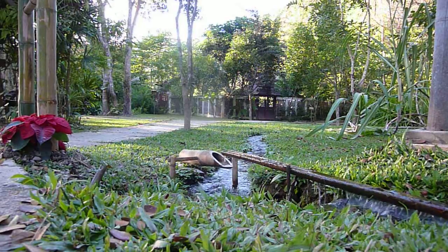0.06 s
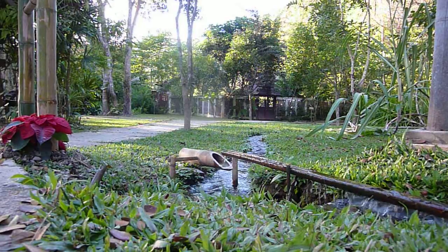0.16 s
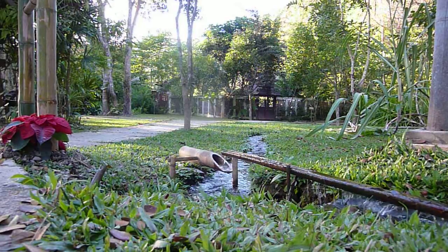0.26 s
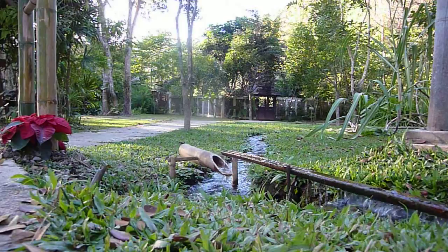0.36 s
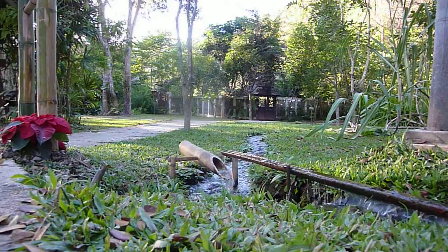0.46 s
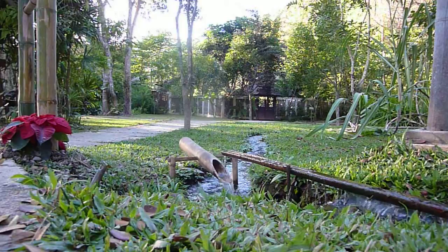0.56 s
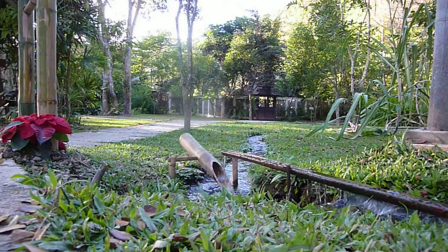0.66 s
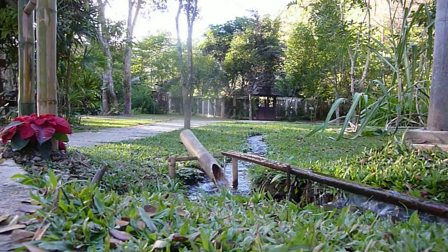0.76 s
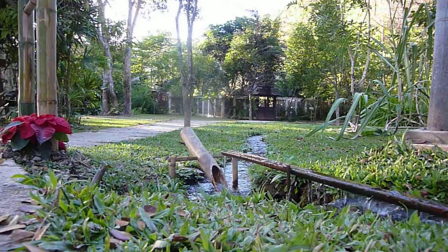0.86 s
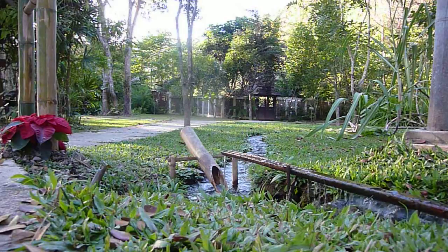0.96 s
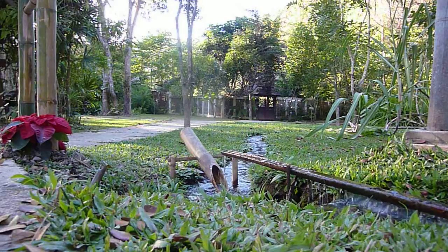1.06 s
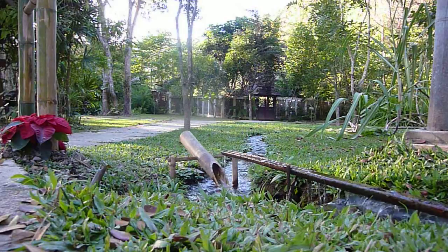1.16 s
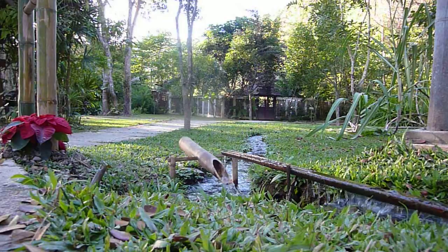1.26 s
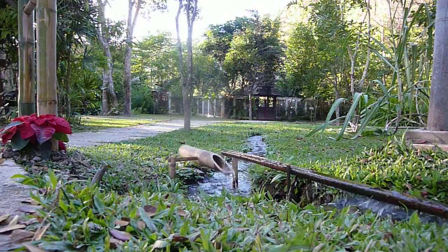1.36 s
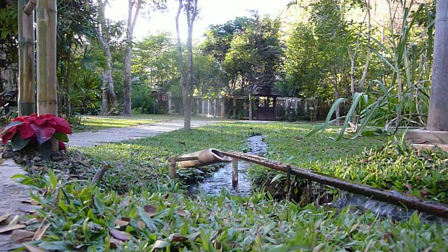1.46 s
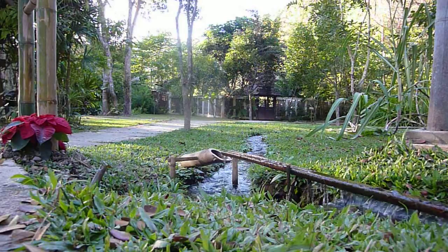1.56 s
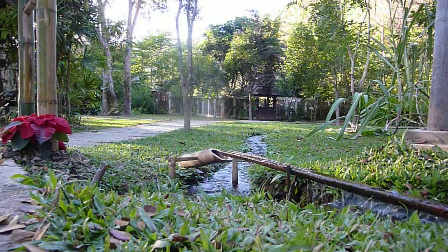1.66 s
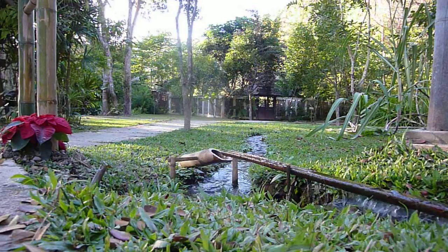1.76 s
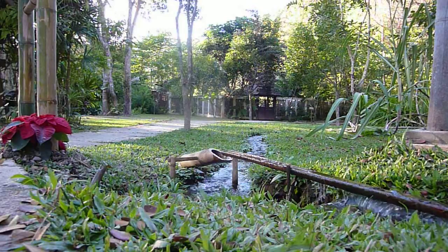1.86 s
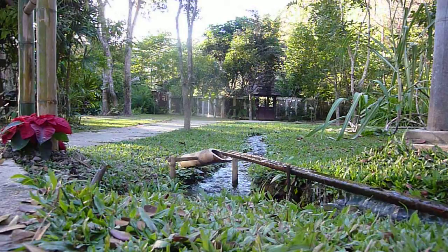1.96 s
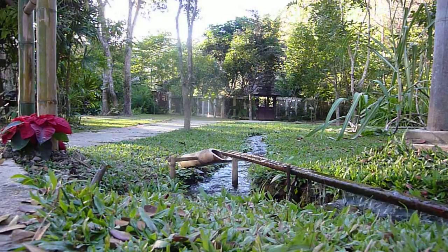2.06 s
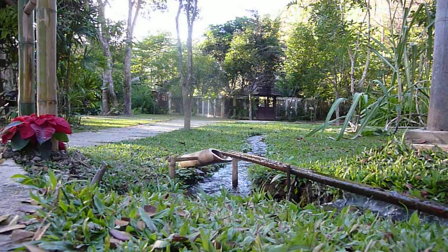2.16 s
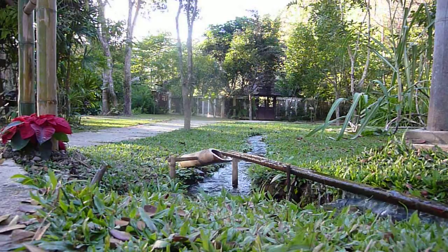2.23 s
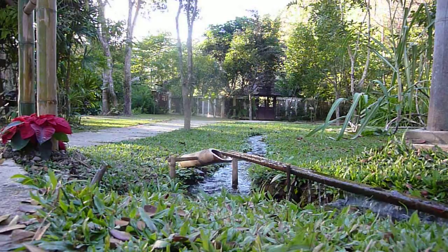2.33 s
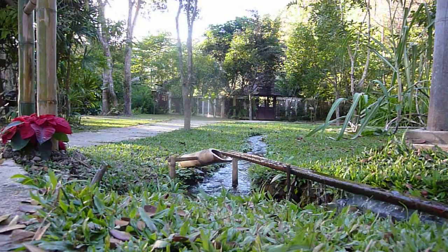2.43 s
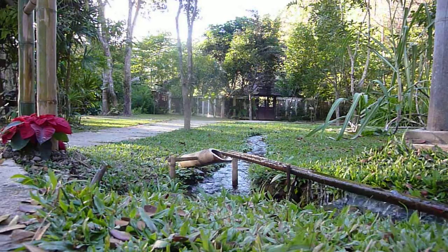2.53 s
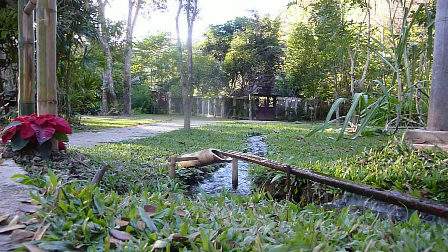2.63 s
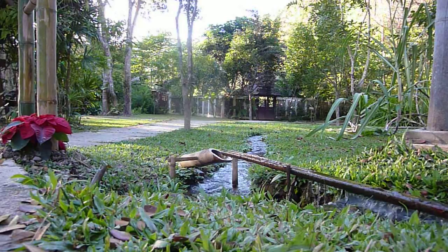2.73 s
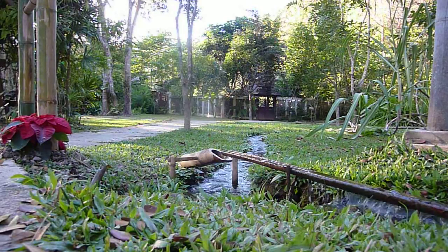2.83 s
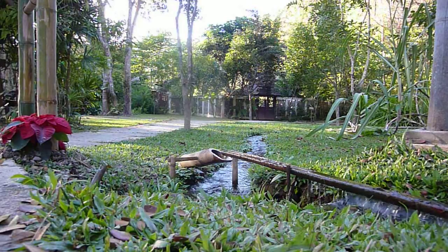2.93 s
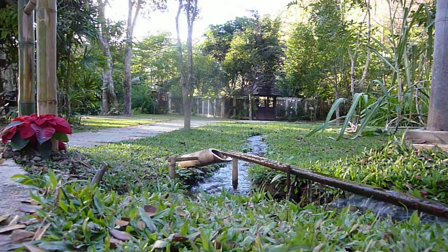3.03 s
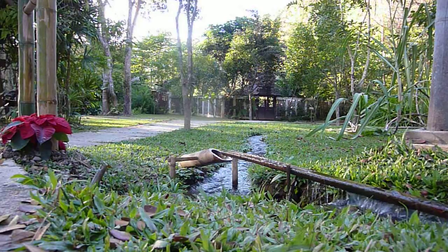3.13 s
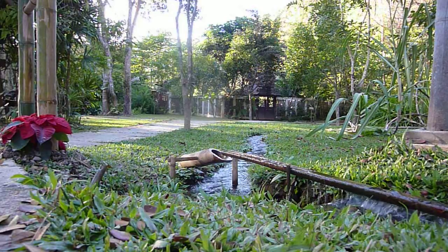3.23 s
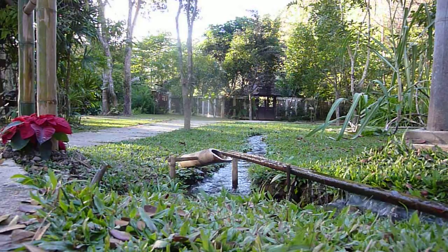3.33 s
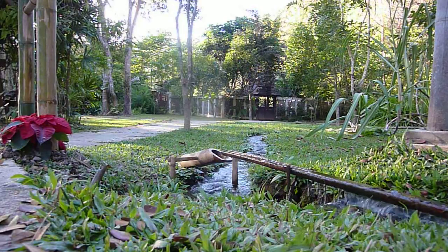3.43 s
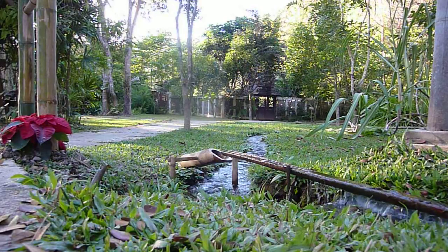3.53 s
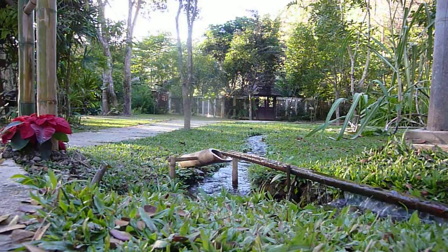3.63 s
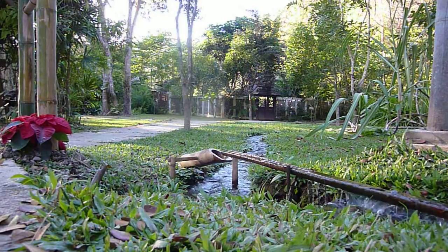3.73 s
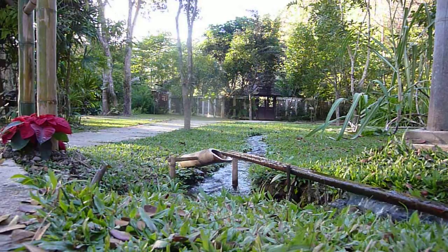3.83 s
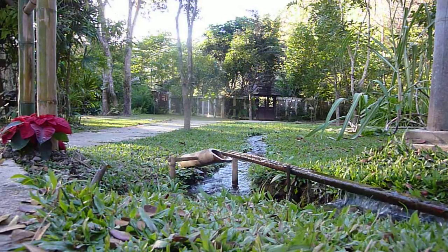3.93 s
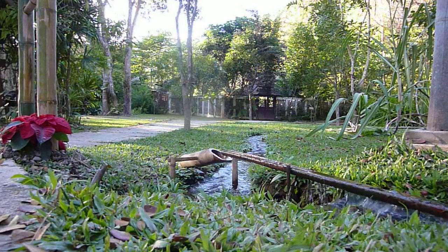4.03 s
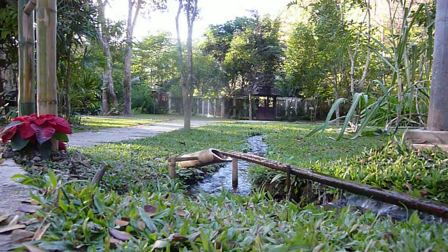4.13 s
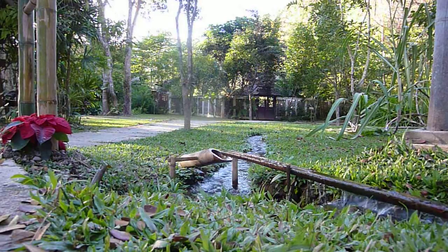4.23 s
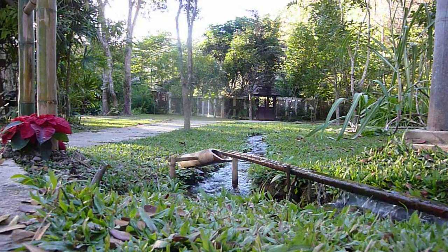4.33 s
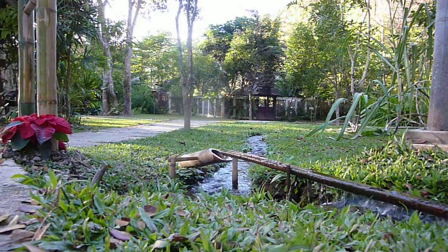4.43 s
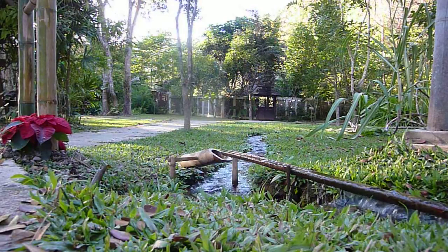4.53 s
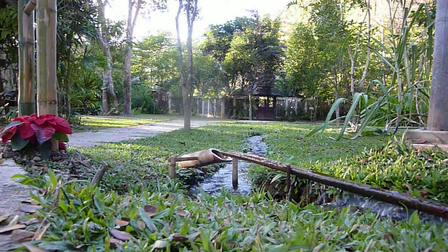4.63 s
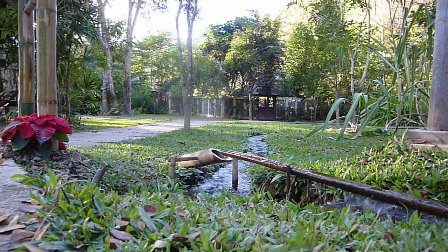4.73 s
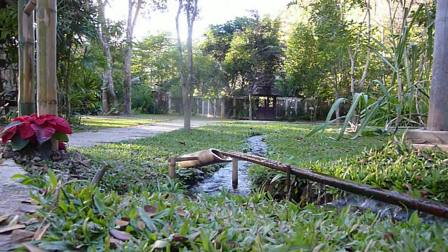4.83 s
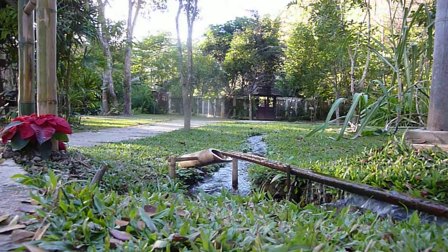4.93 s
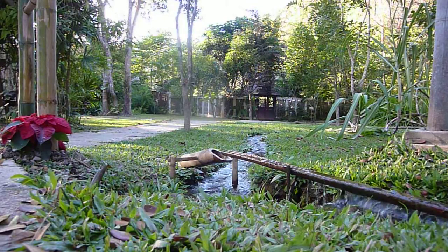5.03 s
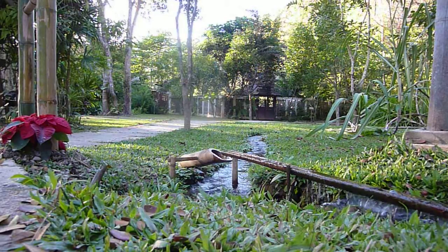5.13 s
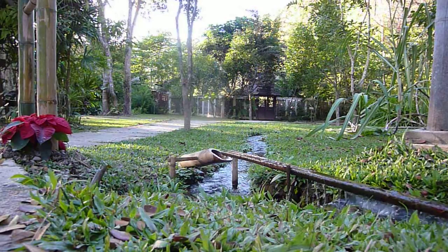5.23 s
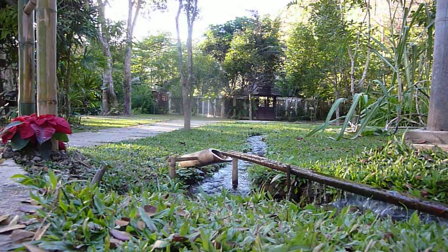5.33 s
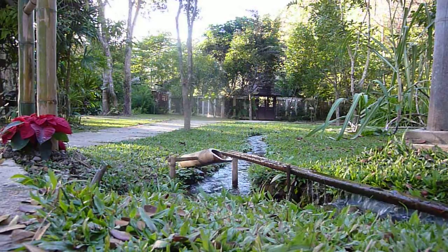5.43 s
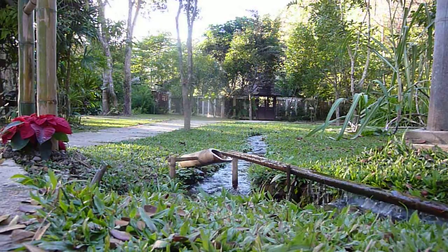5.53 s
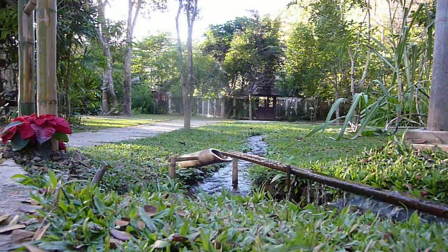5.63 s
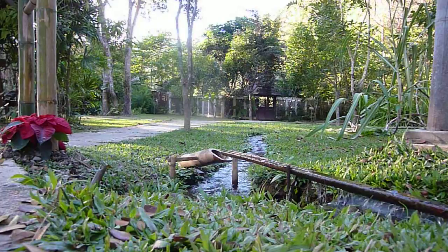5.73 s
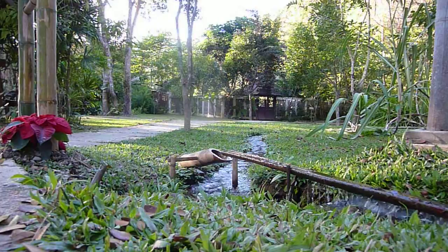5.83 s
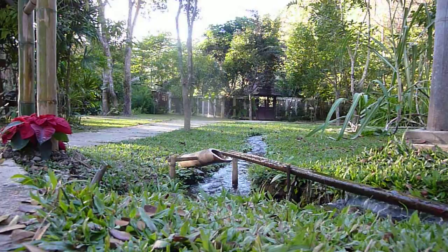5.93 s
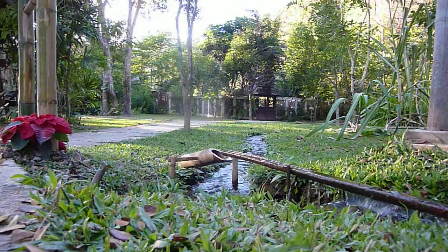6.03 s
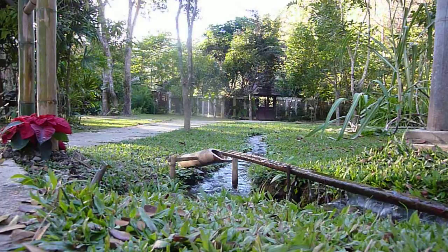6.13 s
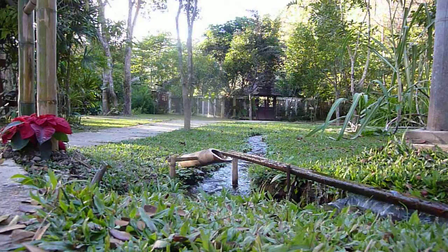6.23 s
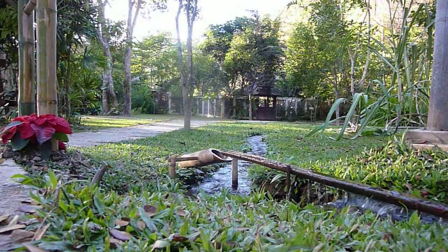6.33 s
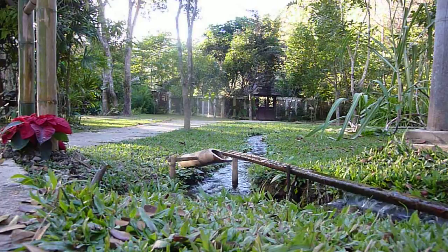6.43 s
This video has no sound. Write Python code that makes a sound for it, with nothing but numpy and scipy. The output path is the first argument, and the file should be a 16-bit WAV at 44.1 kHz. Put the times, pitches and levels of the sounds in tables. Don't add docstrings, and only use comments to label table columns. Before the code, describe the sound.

A small garden stream gurgles and bubbles steadily while bamboo spouts tip with hollow knocks, one very loud near the start, others softer later.

```python
import sys
import numpy as np
from scipy import signal
from scipy.fft import rfft, irfft, next_fast_len
from scipy.io import wavfile
from scipy.ndimage import map_coordinates

SR = 44100
rng = np.random.default_rng(int(sys.argv[2]) if len(sys.argv) > 2 else 0)


def to_linear_factor(level_db):
    exponent = np.asarray(level_db, float) / 20
    return 10 ** exponent


def log_audio(samples):
    frames = np.atleast_2d(samples).T
    limited = np.clip(frames, -1, 1)
    pcm = np.round(limited * 32767).astype(np.int16)
    wavfile.write(sys.argv[1], SR, pcm)


N = 285768

# (time [s], level [dB])
FLOW = [(0.0, -41.5), (0.49, -41.5), (1.24, -41), (1.68, -40.5), (2.11, -43), (3.99, -42.5), (4.26, -42.5),
        (4.55, -43), (4.96, -42), (5.25, -40), (5.65, -43), (6.48, -42)]
# (time [s], peak level [dB], pitch [Hz])
BIG_BUBBLES = [(0.162, -38, 474), (0.797, -40, 377), (0.866, -29, 410), (1.077, -32, 480),
               (1.724, -35.5, 423), (1.735, -36, 560), (1.796, -32, 560), (1.85, -33, 450),
               (2.123, -34, 400), (2.148, -33, 455), (2.607, -36, 620), (2.775, -33.5, 350),
               (2.827, -33.5, 347), (2.854, -29, 404), (2.858, -33, 620), (2.92, -32.5, 363),
               (2.983, -35, 396), (3.369, -33, 457), (3.539, -33, 400), (3.71, -31.5, 340),
               (4.027, -32, 390), (4.17, -34, 395), (4.2, -26.5, 386), (4.369, -34, 450),
               (4.485, -36.5, 410), (4.681, -29, 364), (5.572, -30.5, 400), (5.937, -35, 416),
               (5.971, -34, 367)]
# (time [s], peak level [dB], pitch [Hz])
MIDDLING_BUBBLES = [(0.673, -36, 1340), (0.764, -32, 1070), (0.855, -27.5, 1660), (0.894, -32, 1590),
                    (1.076, -31.5, 1020), (1.327, -47, 930), (1.614, -29.5, 1160), (1.668, -31, 980),
                    (1.838, -36, 950), (1.965, -35, 1050), (2.128, -30.5, 1820), (2.446, -30.5, 1140),
                    (2.651, -30.5, 1300), (2.819, -30.5, 1063), (2.839, -32, 1290), (2.983, -27.5, 1330),
                    (3.129, -34.5, 1105), (3.244, -33.5, 1370), (3.458, -30, 1270), (3.922, -30.5, 1026),
                    (4.052, -35.5, 870), (4.322, -36, 1350), (4.345, -29.5, 1020), (4.677, -35.5, 1040),
                    (4.907, -31, 985), (4.966, -32, 1480), (4.996, -35.5, 1020), (5.921, -27.5, 1096),
                    (6.077, -31.5, 1045), (6.416, -32, 1220)]
# (time [s], peak level [dB], pitch [Hz])
SMALL_DROPS = [(0.065, -32.5, 2540), (0.156, -35, 2690), (0.203, -37, 2620), (0.884, -36, 2920),
               (0.992, -35, 2720), (1.177, -38.5, 6050), (1.224, -36.5, 6470), (1.9145, -34.5, 2440),
               (2.736, -40, 6200), (2.755, -32, 5120), (2.835, -36, 3010), (3.258, -37, 2700),
               (3.315, -33, 5340), (3.555, -35, 2430), (3.6735, -35.5, 5170), (4.157, -33.5, 2480),
               (4.621, -38, 6600), (4.691, -37, 4400), (4.932, -41, 2680), (4.959, -38, 4450),
               (5.161, -37, 2370), (5.309, -40, 2800), (5.459, -32.5, 2450), (5.47, -34, 2480),
               (5.49, -30, 2420), (5.95, -37, 2760), (6.211, -35, 2700)]
# (frequency [Hz], level [dB])
BANK_COLOUR = [(250, -6), (600, -3.5), (780, -3), (1050, 0.5), (1900, 0), (2250, -6), (2700, 0),
               (4000, -2.5)]
# (frequency [Hz], level per Hz [dB])
RUSH_COLOUR = [(71, -50.5), (120, -15.5), (195, -22.5), (384, -0.5), (769, -13), (1340, -12.5), (2220, -16),
               (4840, -21.5), (5460, -21), (6170, -19.5), (7600, -20), (9880, -51.5), (16700, -120)]
# (frequency [Hz], level per Hz [dB])
RUMBLE_COLOUR = [(12, -41.5), (25, -3), (45, -8.5), (60, -1), (75, 0.5), (130, -20.5), (200, -26)]
# (time [s], peak level [dB])
VEHICLES = [
    (1.251, -68.5),
    (2.6, -72.5),
    (3.95, -61.5),
    (5.1, -64),
    (6.2, -64.5),
]
# (frequency [Hz], likeness [0 to 1])
LIKENESS = [(60, 0.87), (160, 0.95), (430, 1), (1130, 0.96), (3020, 0.72), (8050, 0.52)]
# (frequency
# [Hz], level [dB], time to fall 60 dB [s], first swing [out 1, in -1])
FAR_TIP = [(388, -13.8, 0.021, -1), (456, -21.8, 0.105, 1), (500, -7.2, 0.132, -1), (556, -17.4, 0.137, -1),
           (561, -1.3, 0.03, 1), (883, -19.9, 0.018, -1), (1663, -39.2, 0.083, -1)]
FAR_ECHO = [(491, -23.5, 0.14, 1), (507.3, -26.5, 0.35, -0.76)]
FAR_SETTLE = [(516, -38, 0.73, 0.8)]
NEAR_MOUTH = [(391, -20.2, 0.01, -1), (578, -22.3, 0.106, 1), (608, -20.5, 0.051, -1),
              (883, -30.2, 0.293, -1), (933, -31.1, 0.038, -1), (990, -36.8, 0.206, 1),
              (1050, -29.8, 0.108, 1), (1111, -35.9, 0.247, -1), (1391, -28.4, 0.078, -1),
              (1412, -26.9, 0.035, 1), (1762, -36.7, 0.057, 1)]
NEAR_HEEL = [(307, -6.5, 0.01, 1), (483, 6.7, 0.01, -1), (557, -7.1, 0.128, 1), (642, -5.2, 0.036, -1),
             (667, -7.6, 0.116, -1), (744, -5.0, 0.017, 1), (946, -36.6, 0.271, 1), (1039, -10.2, 0.019, 1),
             (1211, -24.6, 0.086, 1), (1306, 0.6, 0.011, 1), (1569, -8.5, 0.015, 1),
             (1915, -28.0, 0.025, 1), (2398, -43.1, 0.034, 1)]
NEAR_RATTLE = [(645, -33.5, 0.13, -1), (560, -37.5, 0.17, 1)]
NEAR_REBOUND = [(540, -22.5, 0.09, -0.67), (560, -34, 0.5, 0.98)]
THIN_TIP = [(309, -51.6, 0.4, 1), (477, -20.8, 0.131, -1), (524, -11.1, 0.029, -1), (643, -27.2, 0.136, -1),
            (699, -21.0, 0.085, -1), (758, -6.9, 0.113, 1), (783, -19.0, 0.36, -1), (1017, -10.2, 0.01, -1),
            (1343, -7.4, 0.012, -1), (1446, -28.4, 0.063, 1), (2221, -34.5, 0.018, 1)]
WIDE_TIP = [(415, -16.6, 0.256, 1), (461, -10.2, 0.164, -1), (483, -9.2, 0.076, 1), (628, -33.5, 0.184, -1),
            (1132, -24.4, 0.021, -1)]
THIN_REBOUND = [(752, -26.8, 0.108, 1)]
WIDE_ECHO = [(415, -33.0, 0.5, 1), (463, -21.9, 0.335, -1), (474, -31.6, 0.5, 1)]
WIDE_SETTLE = [(423, -33.0, 0.5, 1)]
LAST_TIP = [(344, -12.7, 0.015, -1), (399, -23.7, 0.116, -1), (421, -13.3, 0.036, 1),
            (468, -20.6, 0.125, 1), (503, -18.4, 0.122, 1), (555, -17.0, 0.217, -1), (626, -14.4, 0.016, 1),
            (794, -12.6, 0.131, 1), (806, -9.5, 0.056, -1), (914, -28.9, 0.384, 1),
            (1070, -18.3, 0.021, -1), (1154, -29.3, 0.104, -1), (1359, -29.9, 0.059, -1),
            (1527, -32.9, 0.058, -1)]
# (time [s], rings freely until [s],
# left over right [dB], tube pitches [table above])
KNOCKS = [(.2403, .287, -.5, FAR_TIP), (.3203, .4, -1.3, FAR_ECHO), (.4316, .5, -1.5, FAR_SETTLE),
          (1.3405, 1.41, -1.6, NEAR_MOUTH), (1.50464, 1.546, -.9, NEAR_HEEL),
          (1.5698, 1.61, -1.5, NEAR_RATTLE), (1.6417, 1.69, -1.5, NEAR_REBOUND),
          (5.0919, 5.165, -2.1, THIN_TIP), (5.1693, 5.237, -.7, WIDE_TIP),
          (5.2386, 5.325, -.9, WIDE_ECHO), (5.2583, 5.3, -2.1, THIN_REBOUND),
          (5.4184, 5.45, -1.4, WIDE_SETTLE), (6.162, 6.27, -1.9, LAST_TIP)]
CLACK_LEVELS = [-22, -43, -61, -24.5, -13.5, -38.5, -36, -37, -30, -36, -56.5, -63, -28.5]
# (frequency [Hz], time to fall 60 dB [s])
FENCE_DECAY = [(300, 0.79), (1500, 0.22), (6000, 0.16)]
# (frequency [Hz], level [dB])
CAMERA_TOP = [(7600, -0.5), (8300, -0.5), (8700, -5.5), (8900, -55.5), (9500, -95)]
# (frequency [Hz], half-width [Hz])
CAMERA_NOTCHES = [(5430, 170), (7910, 260), (8090, 260)]


def unit(x):
    return x / np.sqrt(np.mean(x ** 2) + 1e-20)


def along(points, hz):
    f, value = np.transpose(points)
    return np.interp(np.log(hz + 1), np.log(f + 1), value)


def wobble(rate):
    points = rng.standard_normal(int(N * rate / SR) + 4)
    return map_coordinates(points, [np.arange(N) * rate / SR])


def filtered(x, response):
    m = next_fast_len(N + SR // 4)
    hz = np.fft.rfftfreq(m, 1 / SR)
    return irfft(rfft(x, m) * response(hz), m)[..., :N]


def coloured(x, curve):
    return filtered(x, lambda hz: to_linear_factor(along(curve, hz)))


def spread(pair):
    def weights(hz):
        turn = np.arccos(np.clip(along(LIKENESS, hz), -1, 1)) / 2
        return np.array([np.cos(turn), np.sin(turn)])

    mid, side = filtered(pair, weights)
    return np.array([mid + side, mid - side])


def bubbles(s, db, hz, cycles, rise, size):
    t = np.arange(size) / SR
    u = t * (hz / cycles)[:, None]
    swell = np.sqrt(2 * u) * np.exp(.5 - u)
    wave = swell * np.sin(2 * np.pi * hz[:, None] * t * (1 + rise * (u / 2 - 1)))
    at = np.round(s * SR).astype(int)[:, None] + np.arange(size)
    return np.bincount(at.ravel(), (to_linear_factor(db)[:, None] * wave).ravel(), N + size)[:N]


def swarm(count, mean_hz, octaves, cycles, scatter_db, size):
    def one_side():
        chance, vary = rng.random((count, 2)), rng.standard_normal((count, 2))
        s = chance[:, 0] * N / SR
        db = -scatter_db * np.log(chance[:, 1] + .004)
        hz = np.clip(mean_hz * 2 ** (octaves * vary[:, 0]), 150, 7800)
        return unit(bubbles(s, db, hz, cycles * np.exp(.3 * vary[:, 1]), .02, size))

    return unit(spread(np.array([one_side(), one_side()])))


def single_bubbles():
    s, db, hz = np.transpose(BIG_BUBBLES + MIDDLING_BUBBLES + SMALL_DROPS)
    cycles = 2.96 * (hz / 1000) ** .62
    return to_linear_factor(-2.2) * bubbles(s, db, hz, cycles, .015, size=1800)


def bank_blur(near):
    size, t60 = 1300, .06
    scatter = rng.standard_normal((2, size)) * to_linear_factor(-60 * np.arange(size) / SR / t60)
    left = scatter[0] + .056 * scatter[1]
    right = scatter[0] - .14 * scatter[1]
    echoes = np.array([left, right]) / np.linalg.norm(scatter[0])
    return to_linear_factor(-7.5) * signal.fftconvolve(near, echoes, axes=1)[:, :N]


def stream():
    flow_db = np.interp(np.arange(N) / SR, *np.transpose(FLOW))
    usual_db = flow_db.mean()
    surge_db = .4 * wobble(12) + 1.1 * wobble(40)

    def follows(db, grows):
        return to_linear_factor(usual_db + db + grows * (flow_db - usual_db) + surge_db)

    gurgle = follows(-2.5, grows=2) * swarm(
        count=900, mean_hz=400, octaves=.35, cycles=1.7, scatter_db=2.5, size=1400)
    blups = follows(-9.5, grows=2) * swarm(
        count=700, mean_hz=630, octaves=.1, cycles=2.6, scatter_db=2.5, size=1000)
    bubbling = follows(-6, grows=1.3) * swarm(
        count=3800, mean_hz=1300, octaves=.45, cycles=3.1, scatter_db=2.3, size=700)
    fizz = follows(-9, grows=.44) * swarm(
        count=4500, mean_hz=3800, octaves=.65, cycles=3.5, scatter_db=2.6, size=400)
    rush = unit(spread(coloured(rng.standard_normal((2, N)), RUSH_COLOUR)))
    rush = follows(-3.5 + .9 * wobble(45), grows=.71) * rush
    near = coloured(gurgle + blups + bubbling + fizz, BANK_COLOUR) + single_bubbles()
    return near + bank_blur(near) + rush


def hum():
    t = np.arange(N) / SR
    pump = to_linear_factor(-55.5 + 1.7 * wobble(18)) * np.sin(2 * np.pi * 100 * t + .2 * wobble(5))
    rumble = to_linear_factor(-64.5) * unit(spread(coloured(rng.standard_normal((2, N)), RUMBLE_COLOUR)))
    traffic = filtered(rng.standard_normal(N), lambda hz: np.exp(-((hz - 185) / 50) ** 2))
    pass_s = .48
    loudness = to_linear_factor(-71.5)
    for s, db in VEHICLES:
        loudness = loudness + to_linear_factor(db) * np.exp(-((t - s) / pass_s) ** 2)
    return pump + rumble + loudness * unit(traffic)


def tube_ring(modes, free_s, t):
    ring = np.zeros(len(t))
    for hz, db, t60, way in modes:
        rough_db = 2 * np.clip((t - .01) / .03, 0, 2) * map_coordinates(rng.standard_normal(44), [t * 80])
        ring += way * to_linear_factor(db - 60 * t / t60 + rough_db) * np.sin(2 * np.pi * hz * t)
    onset = 1 - np.exp(-t / .001)
    choke = to_linear_factor(-60 * np.maximum(t - free_s, 0) / .04)
    return ring * onset * choke


def clack(db, t):
    band = signal.butter(2, [700 * 2 / SR, 2400 * 2 / SR], "band")
    dull = signal.lfilter(*band, rng.standard_normal(len(t)))
    tick = to_linear_factor(db - 19 - 60 * t / .011) * rng.standard_normal(len(t))
    return to_linear_factor(db - 60 * t / .045) * dull + tick


def spouts():
    out = np.zeros((2, N + SR))
    t = np.arange(SR // 2) / SR
    for (s, until, pan_db, modes), clack_db in zip(KNOCKS, CLACK_LEVELS):
        knock = to_linear_factor(1) * tube_ring(modes, until - s, t) + clack(clack_db, t)
        sides = to_linear_factor(np.array([[pan_db], [-pan_db]]) / 2)
        start = round(s * SR)
        out[:, start:start + len(t)] += sides * knock
    return out[:, :N]


def fences(x):
    hz, t, z = signal.stft(rng.standard_normal((2, SR // 2)), SR, nperseg=256)
    fade = to_linear_factor(-60 * t / along(FENCE_DECAY, hz)[:, None])
    tail = signal.istft(z * fade, SR, nperseg=256)[1]
    tail = np.array([tail[0] + .21 * tail[1], tail[0] - .12 * tail[1]])
    late = np.pad(x, (1800, 0))
    return signal.fftconvolve(late[None], tail / np.linalg.norm(tail[0]), axes=1)[:, :N]


def ducking(knocks):
    depth_db, back_s = -16, .28
    overload = np.flatnonzero(np.abs(knocks).max(0) > .8)[-1]
    since = np.arange(N) / SR - overload / SR
    return to_linear_factor(depth_db * np.clip(1 - since / back_s, 0, 1) ** 2 * (since > 0))


def bird():
    start_s, length_s, low_hz, high_hz = 3.35, .1, 2110, 2290
    u = np.clip((np.arange(N) / SR - start_s) / length_s, 0, 1)
    phase = 2 * np.pi * np.cumsum(low_hz + (high_hz - low_hz) * u) / SR
    return to_linear_factor(-51) * np.sin(np.pi * u) * np.sin(phase)


def scene():
    knocks = spouts()
    answer = to_linear_factor(-24) * fences(knocks.mean(0))
    to_right = to_linear_factor(np.array([[-.9], [.9]]))
    steady = (stream() + hum() + bird() + answer) * to_right
    return knocks + ducking(knocks) * steady


def low_pass(x):
    return signal.sosfilt(signal.butter(12, 16000, fs=SR, output="sos"), x)


def record(dry):
    def response(hz):
        gain = to_linear_factor(along(CAMERA_TOP, hz))
        for centre, width in CAMERA_NOTCHES:
            gain = gain * np.abs(hz - centre) / np.hypot(hz - centre, width)
        return gain

    heard = filtered(np.array([np.roll(dry[0], 1), dry[1]]), response)
    whine = filtered(rng.standard_normal((2, N)), lambda hz: np.exp(-((hz - 8000) / 36) ** 2))
    mix = heard + to_linear_factor(-78.5 + 3 * wobble(7.6)) * unit(whine)
    return low_pass(np.clip(mix, -1, 1))


dry = scene()
out = record(dry)
log_audio(out)
```